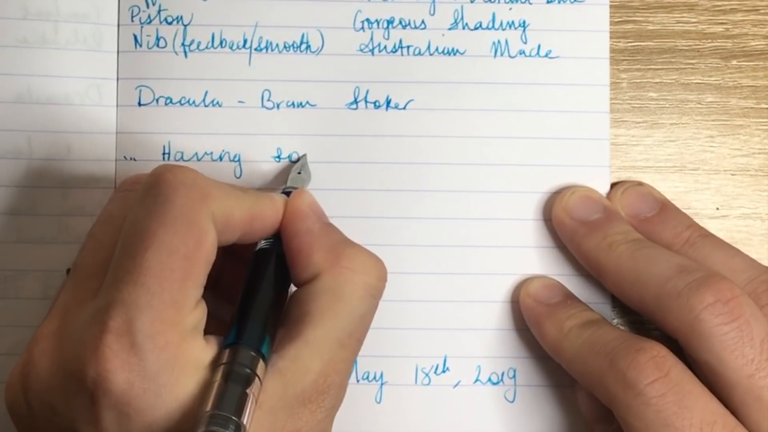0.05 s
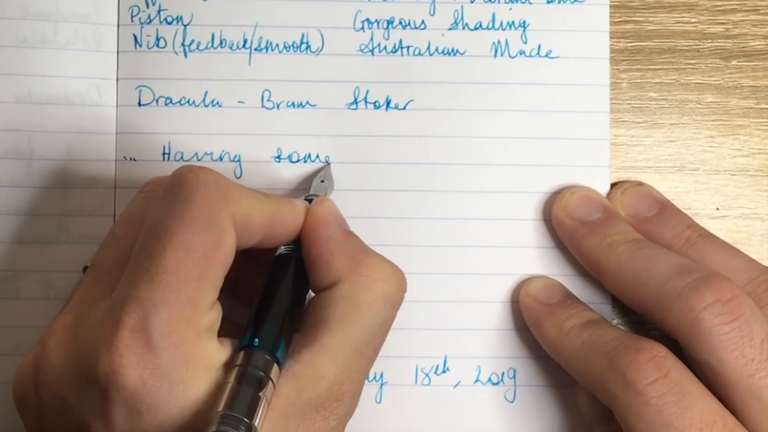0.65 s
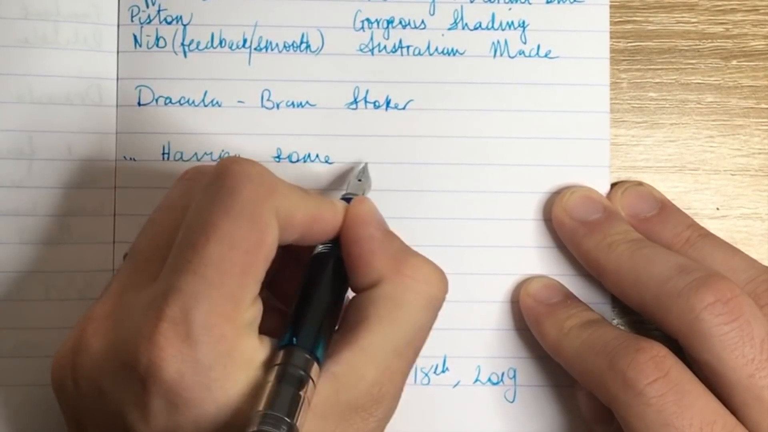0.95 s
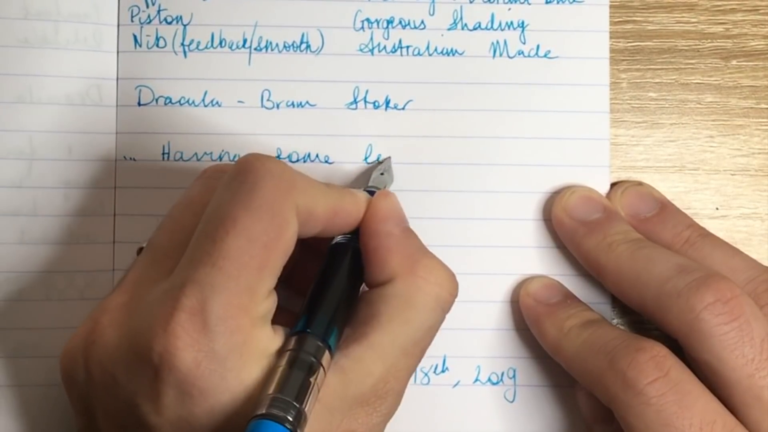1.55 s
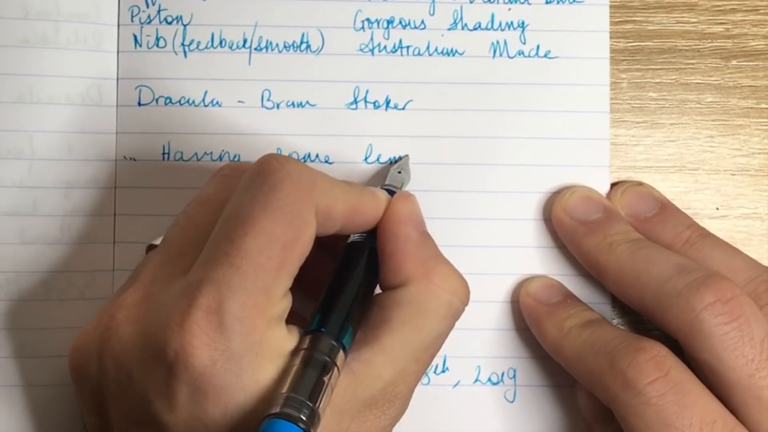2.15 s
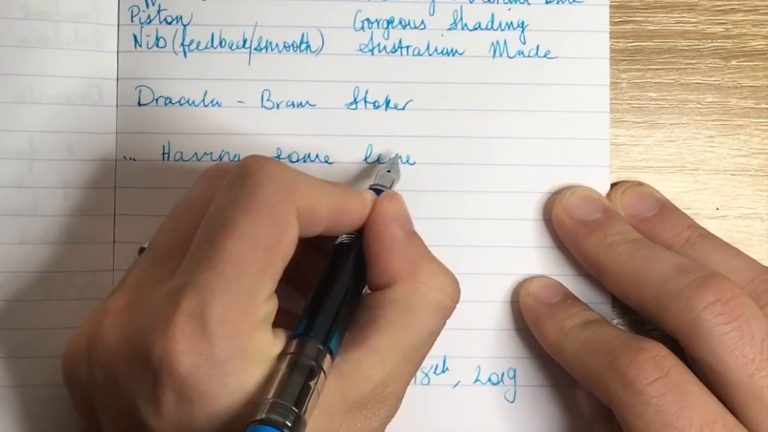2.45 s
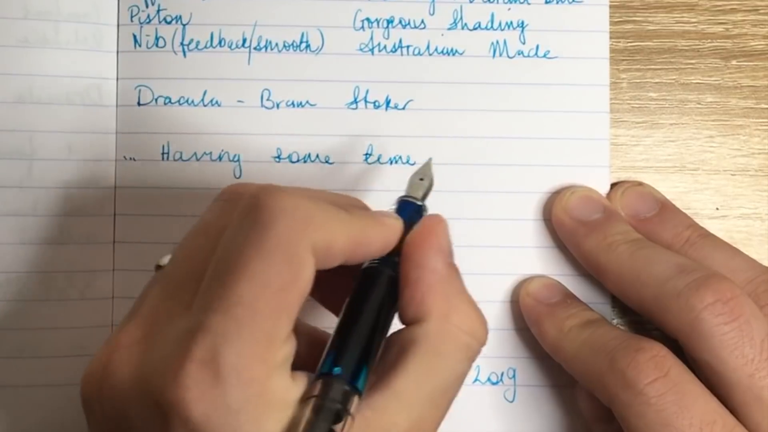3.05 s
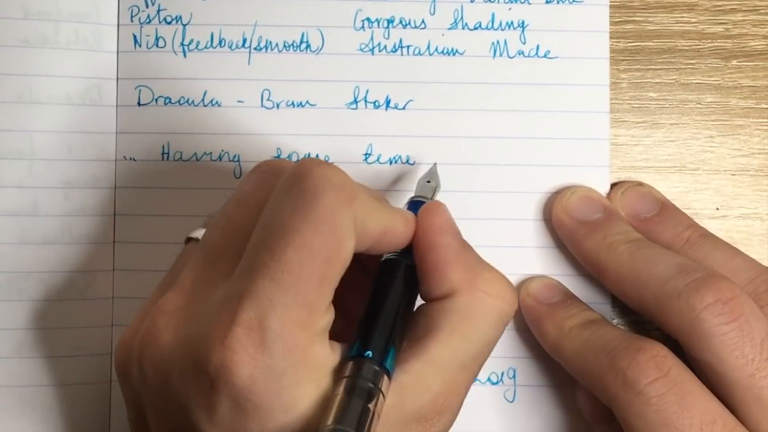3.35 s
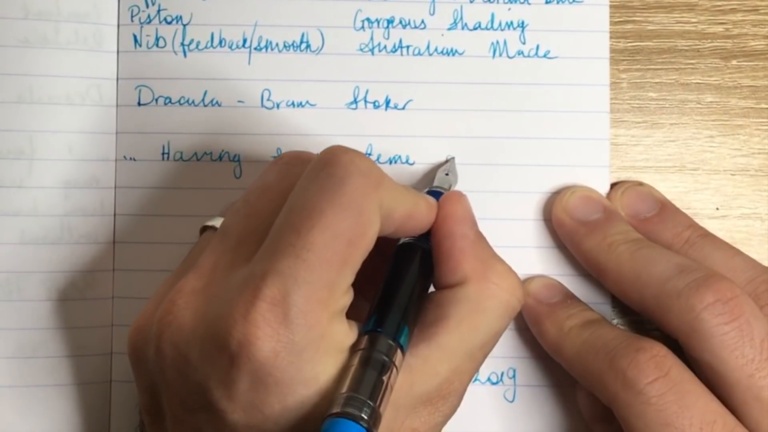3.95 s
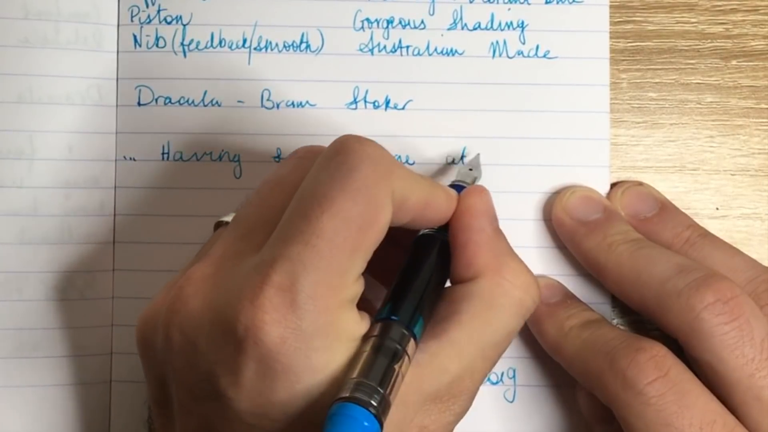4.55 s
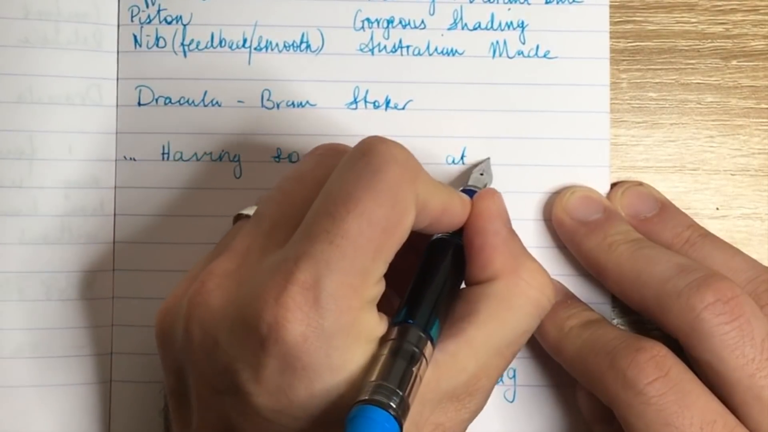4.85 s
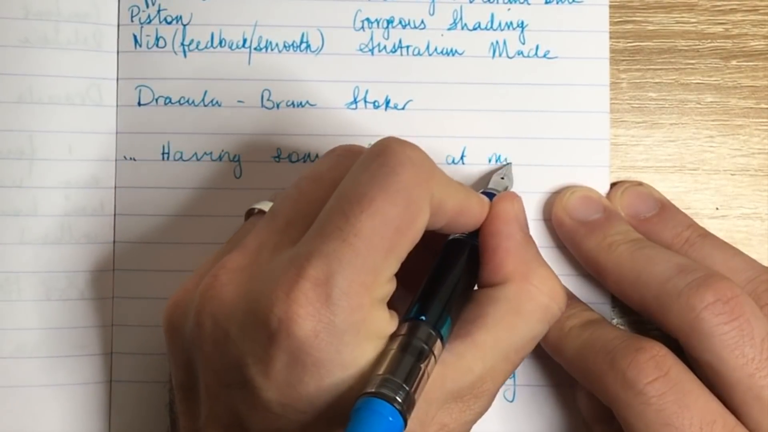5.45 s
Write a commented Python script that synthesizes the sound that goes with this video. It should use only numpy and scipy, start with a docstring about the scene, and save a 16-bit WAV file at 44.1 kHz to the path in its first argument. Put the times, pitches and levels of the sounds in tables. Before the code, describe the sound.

A fountain pen scratches lightly on smooth paper in short runs, with small ticks and hand slides over a low room hum.

```python
"""A fountain pen scratches out a few words, close by, on smooth paper on a wooden desk in a quiet room.
Each stroke drags the nib (the metal tip) over paper fibres, which makes the nib, pen and sheet ring.
The hand slides over the page and softly bumps the desk, and between words the pen ticks.
Underneath lie the room's rumble and hiss, and a low hum that creeps up in pitch and fades."""
import sys
import numpy as np
from scipy import signal
from scipy.fft import rfft, irfft
from scipy.io import wavfile

SR = 44100
rng = np.random.default_rng(int(sys.argv[2]) if len(sys.argv) > 2 else 0)


def int16_out(signal):
    """Quantize to a 16-bit WAV file."""
    q = np.round(np.clip(np.atleast_2d(signal).T, -1, 1) * 32767)
    wavfile.write(sys.argv[1], SR, q.astype(np.int16))


N = 251811
TIME = np.arange(N) / SR
HZ = np.fft.rfftfreq(N, 1 / SR)


def amp(db):
    """Turns decibels into a number to multiply a sound by."""
    return 10 ** (np.asarray(db) / 20)


def unit(x):
    """Scales a signal so that its average size (rms) is 1."""
    return x / np.sqrt(np.mean(x ** 2) + 1e-20)


def add(mix, s, sound):
    """Mixes a sound in, starting at s seconds."""
    part = mix[max(round(s * SR), 0):][:len(sound)]
    part += sound[:len(part)]


def level(rows):
    """A volume curve through rows of t/s, level/dB."""
    return amp(np.interp(TIME, *np.transpose(rows)))


def noise(colour):
    """Steady noise, its lows and highs shaped by rows of f/Hz, level/dB."""
    hz, db = np.transpose(colour)
    gain = amp(np.interp(np.log(HZ + 1), np.log(hz), db))
    return unit(irfft(rfft(rng.standard_normal(N)) * gain, N))


def wander(rate):
    """A smooth random wobble that changes up to about rate times a second."""
    return unit(irfft(rfft(rng.standard_normal(N)) * np.exp(-(HZ / rate) ** 2), N))


def ring(push, modes, size=4096):
    """A push makes an object ring at its modes, the pitches it naturally shakes at."""
    f = abs(np.fft.fftfreq(size, 1 / SR))
    power = 0
    for hz, width, db in modes:
        peak = amp(db) ** 2 / (1 + 2 * ((f - hz) / width) ** 2) ** 2
        bass_cut = f ** 2 / (f ** 2 + (hz / 2) ** 2)
        power += peak * bass_cut
    log_gain = np.log(power + 1e-9) / 2
    spectrum = np.exp(np.conj(signal.hilbert(log_gain)))  # puts the ringing after the push, not before
    response = np.fft.ifft(spectrum).real[:size // 2]
    return signal.oaconvolve(push, response / np.linalg.norm(response))[:len(push)]


def fibres(per_s, spread_db):
    """Paper fibres catch and let go: a dense stream of clicks of uneven size."""
    size = amp(spread_db * np.minimum(rng.exponential(1, N), 3))
    return unit(size * rng.uniform(-0.99, 1, N) * (rng.random(N) < per_s / SR))


def grip(modes, bright_db_per_octave=0, pitch_spread=0.018, vary_db=0.6):
    """Grip and pen angle nudge the ringing pitches and their levels from stroke to stroke."""
    hz, width, db = np.transpose(modes)
    detune, emphasis = rng.standard_normal((2, len(hz)))
    tilt_db = bright_db_per_octave * np.log2(hz / hz[0])
    return np.transpose([hz * (1 + pitch_spread * detune), width, db + vary_db * emphasis + tilt_db])


def hand_echo(x, echo=0.34, near_s=0.00043, far_s=0.0014):
    """A close echo off the writing hand makes each stroke hollow in its own way."""
    lag = round(rng.uniform(near_s, far_s) * SR)
    delayed = np.pad(x, (lag, 0))[:len(x)]
    return (x + echo * delayed) / np.hypot(1, echo)


def writing(flutter_db=1.54, shared=0.64, pause_s=0.3, rasp_fade_db_per_s=0.6, fizz_db=-16):
    """In each stroke the nib speeds up and slows down; the nib scratches and the sheet rasps."""
    # pen strokes: middle t/s, length/s, strength/dB, lean on the sheet/dB
    strokes = [(.003, 0.097, -61.5, 0), (0.087, 0.095, -62, -2), (0.18, .082, -62.5, -0.5),
               (0.279, 0.079, -59.5, 2), (.364, 0.073, -60.5, 1.5), (0.46, 0.094, -63.5, -0.5),
               (0.55, 0.091, -60.5, -2.5), (0.642, 0.13, -65.5, 0), (0.73, 0.087, -61.5, -2),
               (0.785, 0.069, -65, -4), (1.201, 0.057, -60.5, 2.5), (1.24, 0.058, -50, -0.5),
               (1.318, 0.095, -55, 2), (1.406, 0.098, -60.5, 1), (1.514, 0.11, -62.5, 0),
               (1.608, 0.12, -64.5, -1), (1.711, 0.07, -61, .5), (1.812, 0.08, -61, 0.5),
               (1.901, 0.06, -59.5, .5), (2.01, .085, -62, 1.5), (2.099, 0.068, -58.5, 0.5),
               (2.183, 0.1, -66.5, 0), (2.235, 0.043, -61.5, -4), (2.304, 0.08, -59.5, -1.5),
               (2.371, .08, -65.5, -1), (3.882, 0.068, -64.5, -11), (3.941, 0.087, -59.5, -1.5),
               (4.023, .08, -63, 0.5), (4.108, 0.078, -64, -2), (4.191, 0.097, -62.5, -0.5),
               (4.245, 0.075, -54, 2.5), (4.377, 0.093, -55.5, 1), (4.984, 0.055, -60, 1.5),
               (5.079, 0.087, -61, 2.5), (5.152, 0.07, -56, 0), (5.255, .085, -60.5, 4),
               (5.336, 0.064, -58.5, 1), (5.416, 0.097, -66.5, 1.5), (5.5, 0.072, -62, 0),
               (5.59, 0.13, -65, 1), (5.702, 0.096, -52.5, 0.5)]
    # how the nib and pen ring: f/Hz, width/Hz, level/dB
    nib_modes = [(3290, 570, 3.5), (3620, 1250, -3.5), (4180, 760, 3), (5480, 540, 0), (6290, 200, 1),
                 (7460, 900, 5.5), (8560, 420, 2), (9620, 720, 4), (11190, 820, 4), (11800, 590, 1),
                 (12600, 310, -13)]
    # how the sheet on the desk rings: f/Hz, width/Hz, level/dB
    sheet_modes = [(243, 124, 11.5), (600, 90, 0.5), (876, 134, 5.5), (1076, 120, -0.5), (1113, 167, 6.5),
                   (1507, 183, 7), (1760, 29, 5), (2023, 430, 0), (2470, 210, -23)]
    out = np.zeros(N)
    flutter = amp(flutter_db * wander(74))  # uneven paper makes the rubbing flutter
    snags = fibres(per_s=20000, spread_db=1.8)
    # the sheet feels the nib's snags, plus tugs of its own
    tugs = shared * snags + np.sqrt(1 - shared ** 2) * fibres(per_s=6000, spread_db=0.5)
    gaps = np.diff([row[0] for row in strokes], append=strokes[-1][0])
    for (middle, length, strength_db, lean_db), gap in zip(strokes, gaps):
        speed_up_share = 0.85 if gap > pause_s else 0.55  # before a pause the nib flicks off late
        start, end = middle - length / 2, middle + length / 2
        span = slice(max(round(start * SR), 0), round((end + 0.02) * SR))
        progress = np.interp(TIME[span], [start, start + speed_up_share * length, end], [0, 0.5, 1])
        speed = abs(np.sin(np.pi * progress))
        rasp_db = -59 + lean_db + 0.52 * (strength_db + 61)  # harder strokes rasp louder
        rasp_db -= rasp_fade_db_per_s * middle  # the sheet answers less further along the line
        scratch = amp(strength_db) * speed ** 1.21 * flutter[span] * snags[span]
        rasp = amp(rasp_db) * speed ** 0.82 * flutter[span] * tugs[span]
        brightness = 0.29 * (strength_db + 58)  # harder strokes are brighter
        nib = ring(scratch, grip(nib_modes, brightness))
        # the fibres themselves, heard directly
        fizz = amp(fizz_db) * ring(scratch, [(9700, 1700, -26.5), (15000, 6400, 13.5)])
        sheet = ring(rasp, grip(sheet_modes))
        out[span] += hand_echo(nib + fizz + sheet)
    return out


def hand(rise_share=0.38, swell_db=24.5, resting_db=-75.5):
    """As the hand shifts, sliding skin hisses and its heel murmurs; light grazes whisper."""
    # shifts of the hand: fastest t/s, length/s, skin level/dB, heel level/dB
    shifts = [(0.145, 1.2, -84, -70), (0.827, 0.081, -56, -57), (0.92, 0.75, -79, -64.5),
              (2.834, .13, -60.5, -53), (2.996, 0.47, -67.5, -63.5), (3.317, 0.16, -70.5, -73),
              (4.302, 1.47, -75, -58.5), (4.638, 0.41, -65.5, -79.5), (5.246, 3, -90, -67.5)]
    # hiss of sliding skin: f/Hz, level/dB
    skin_colour = [(200, -49), (600, 21.5), (1800, 13.5), (2800, 5), (4500, 9.5), (7000, 8.5), (9500, 7.5),
                   (12000, 4), (16000, -15)]
    # murmur of the dragging heel: f/Hz, width/Hz, level/dB
    heel_modes = [(177, 38, -5.5), (257, 39, 5), (373, 67, -1), (560, 79, -1.5), (860, 480, -16.5)]
    # light grazes of the page: middle t/s, length/s, level/dB, f/Hz
    grazes = [(0.564, 0.12, -67.5, 7100), (0.751, 0.083, -67, 7200), (.94, 0.03, -67, 6900),
              (2.675, .03, -71.5, 7100), (3.295, 0.091, -70, 5700), (3.622, .041, -72, 6660),
              (4.678, 0.23, -71.5, 7200), (4.816, .073, -72.5, 6800)]
    skin, heel = np.zeros(N), np.full(N, amp(resting_db))  # the heel never lies quite still
    for s, length, skin_db, heel_db in shifts:
        along = (TIME - s) / length
        from_peak = np.maximum(-along / rise_share, along / (1 - rise_share))
        motion = amp(-swell_db * from_peak)  # swells, then dies away
        skin = np.hypot(skin, amp(skin_db) * motion)
        heel = np.hypot(heel, amp(heel_db) * motion)
    out = skin * noise(skin_colour)
    out += heel * ring(fibres(per_s=1600, spread_db=0.5), heel_modes)
    for s, length, db, hz in grazes:
        swell = np.hanning(int(length * SR))
        whisper = ring(rng.standard_normal(len(swell)), [(hz, 1100, 0), (9500, 4000, -10)])
        add(out, s - length / 2, amp(db) * swell * whisper)
    return out


def hum(start_hz=94.2, creep_hz_per_s=1.6, gain_db=-1, octave_db=-24, waver_db=1.5, fade_db_per_s=25):
    """A low, wavering hum with a faint tone an octave above creeps up in pitch, then fades."""
    # the hum's rise and fall before it fades: t/s, level/dB
    swells = [(0, -49), (.85, -51.5), (1.17, -45), (1.45, -51), (2.3, -42), (2.7, -47), (2.87, -64),
              (3.15, -41.5), (3.98, -46)]
    phase = 2 * np.pi * np.cumsum(start_hz + creep_hz_per_s * TIME) / SR
    tone = unit(np.sin(phase) + amp(octave_db) * np.sin(2 * phase))
    fade_db = fade_db_per_s * np.maximum(TIME - swells[-1][0], 0)
    return level(swells) * amp(gain_db + waver_db * wander(6.4) - fade_db) * tone


def room(waver_db=0.1, hiss_db=-65):
    """The room rumbles gently under an even hiss."""
    # the rumble's rise and fall: t/s, level/dB
    swells = [(0, -48.5), (1.3, -47.5), (4.15, -47.5), (4.55, -53.5), (5.71, -51)]
    # the rumble's deep tone: f/Hz, level/dB
    rumble_colour = [(15, -49), (30, -11), (48, -2.5), (68, 3), (95, -6), (135, -3), (165, -18.5),
                     (230, -22), (320, -45.5), (600, -61.5)]
    # the room's hiss: f/Hz, level/dB
    hiss_colour = [(100, 10), (450, 4), (700, 4), (870, 4), (1300, -0.5), (2000, -2), (2400, -0.5),
                   (2700, -6.5), (4200, -7.5), (4900, -11.5), (5500, -8), (9500, -14.5), (12500, -15),
                   (16000, -16)]
    rumble = level(swells) * amp(-waver_db * wander(1.1)) * noise(rumble_colour)
    return rumble + amp(hiss_db) * noise(hiss_colour)


def walls(x, echo_db=-17, fade_s=0.2):
    """The walls send back a faint, short echo."""
    t = np.arange(SR // 3) / SR
    tail = rng.standard_normal(len(t)) * amp(-60 * t / fade_s) * (t > 0.004)
    return amp(echo_db) * signal.oaconvolve(x, tail / np.linalg.norm(tail))[:N]


def ticks(chatter=0.27, treble_hz=2800, barrel_db=5, damping_s=0.013):
    """A sharp tap and a short chatter ring the pen and desk; long chatter muffles the pen's own ring."""
    # taps of the pen on fingers and paper: t/s, strength/dB, treble/dB, chatter time/s
    taps = [(.823, -22.5, -1, 0.0099), (.829, -30, -3, 0.015), (.839, -32, -1, 0.045),
            (.857, -20.5, -12, 0.021), (.862, -24.5, -19, 0.11), (.949, -36, -4, .011),
            (2.611, -29.5, -3, 0.0044), (2.813, -30.5, 2, 0.02), (2.832, -24, -12, 0.067),
            (2.852, -32.5, -19, .05), (2.868, -35, 5, 0.036), (3.004, -33.5, 3, .03),
            (3.02, -36.5, 18, .02), (4.643, -30.5, -7, .065)]
    # how the pen and desk ring when tapped: f/Hz, width/Hz, level/dB
    knock_modes = [(222, 84, 1.5), (494, 130, -12), (805, 170, -1.5), (1016, 52, 1.5), (1430, 690, -3.5),
                   (1910, 380, -8.5), (2300, 160, -4.5), (3470, 1100, -12), (4300, 690, -14),
                   (5440, 940, -17), (6340, 360, -10.5), (8100, 4500, -16.5), (12600, 3200, -19)]
    # how the pen's barrel rings after a clean tap: f/Hz, width/Hz, level/dB
    barrel_modes = [(1040, 270, 0)]
    out, t = np.zeros(N), np.arange(SR // 8) / SR
    for s, db, treble_db, chatter_s in taps:
        push = chatter * rng.standard_normal(len(t)) * amp(-60 * t / chatter_s)
        push[0] += 1  # the tap itself
        barrel = amp(barrel_db) * np.exp(-chatter_s / damping_s) * ring(push, barrel_modes)
        tick = ring(push, knock_modes) + barrel
        dull = signal.lfilter(*signal.butter(1, treble_hz, fs=SR), tick)
        tick = dull + amp(treble_db) * (tick - dull)
        add(out, s, amp(db) * tick / np.linalg.norm(tick))
    return out


def bumps(gain_db=-4, rise_s=0.0061):
    """The desk answers each soft bump with two or three low swings."""
    # bumps of the hand on the desk: t/s, strength/dB, f/Hz
    thumps = [(0.831, -31, 99), (.937, -43, 103), (1.303, -28, 83), (1.346, -32, 95), (2.045, -31, 80),
              (2.234, -32, 91), (2.38, -34, 97), (2.787, -32.5, 84.5), (4.202, -34, 91.5),
              (4.664, -37.5, 89), (4.879, -42, 65), (5.014, -32, 64), (5.126, -34, 54.3)]
    out, t = np.zeros(N), np.arange(SR // 6) / SR
    swell = t / rise_s * np.exp(1 - t / rise_s)
    for s, db, hz in thumps:
        add(out, s, amp(db + gain_db) * swell * np.sin(2 * np.pi * hz * t))
    return out


def scene():
    """Mixes the pen, hand, desk and room into one channel."""
    close_sounds = writing() + ticks() + hand()
    return (close_sounds + walls(close_sounds) + bumps() + hum() + room())[None]


def record(dry, cutoff_hz=15850):
    """Cuts away the very highest treble."""
    low_pass = signal.firwin(1023, cutoff_hz, window=("kaiser", 9), fs=SR)
    return signal.oaconvolve(dry, low_pass[None], "same")


dry = scene()
out = record(dry)
int16_out(out)
```